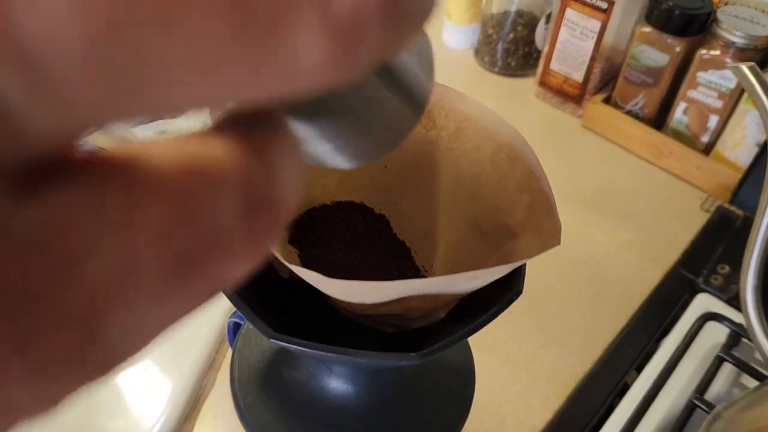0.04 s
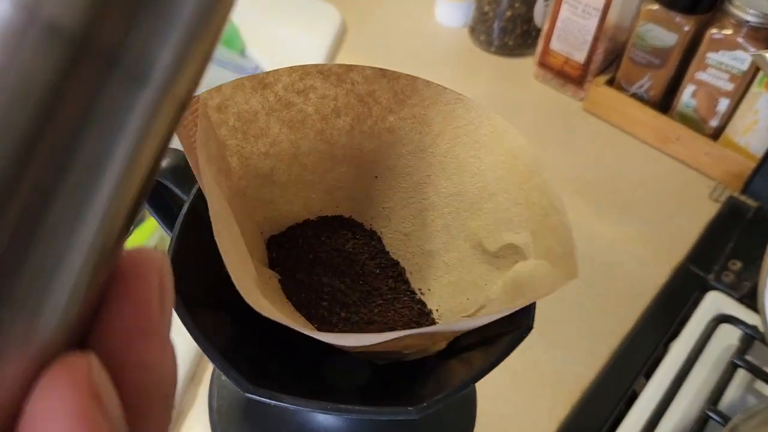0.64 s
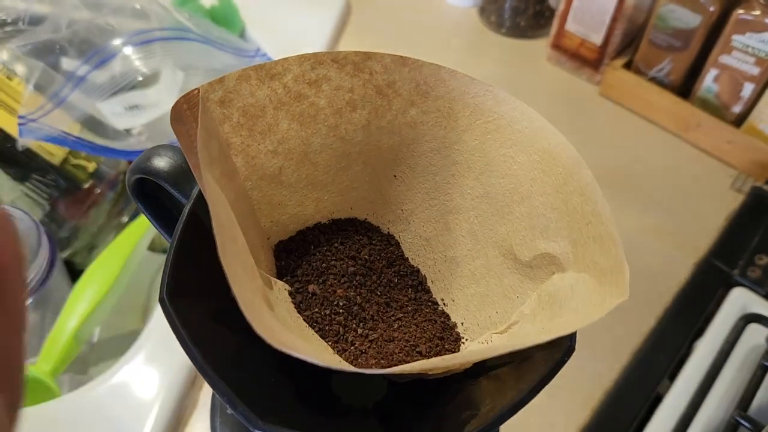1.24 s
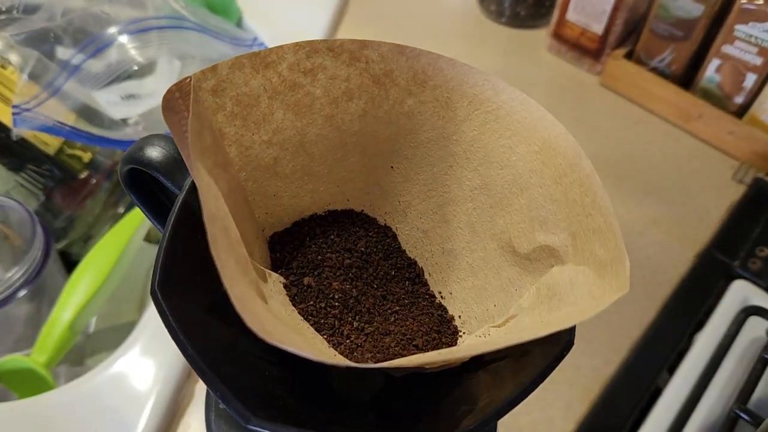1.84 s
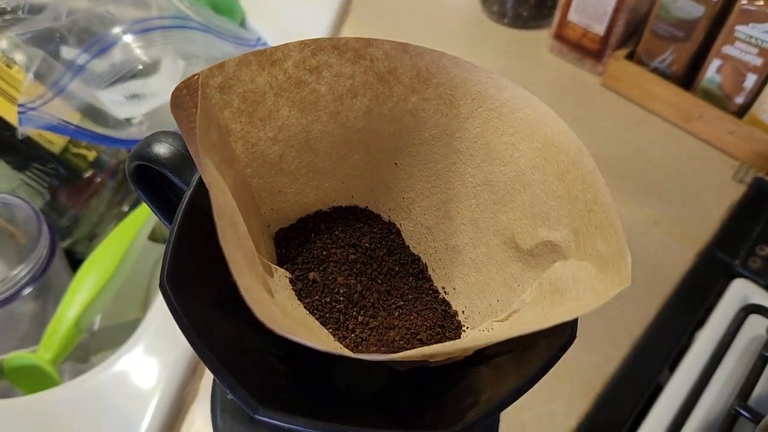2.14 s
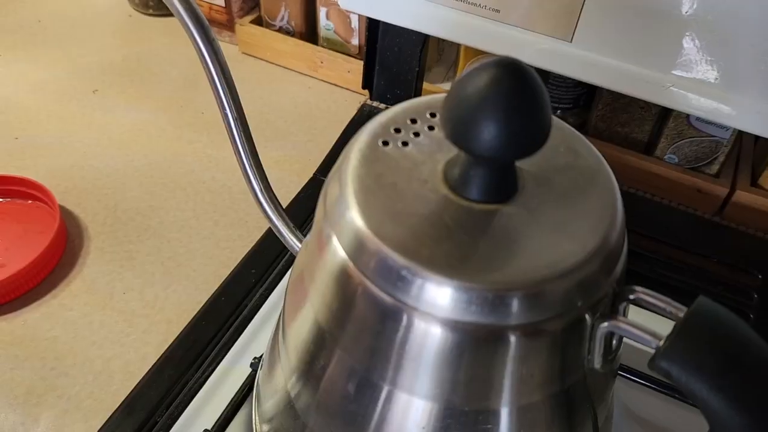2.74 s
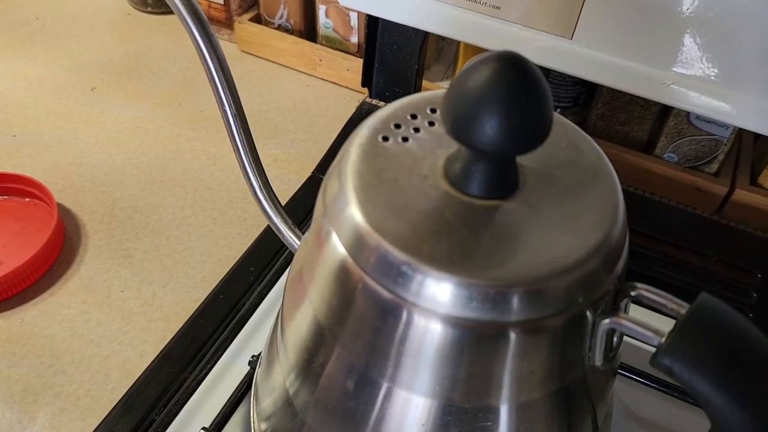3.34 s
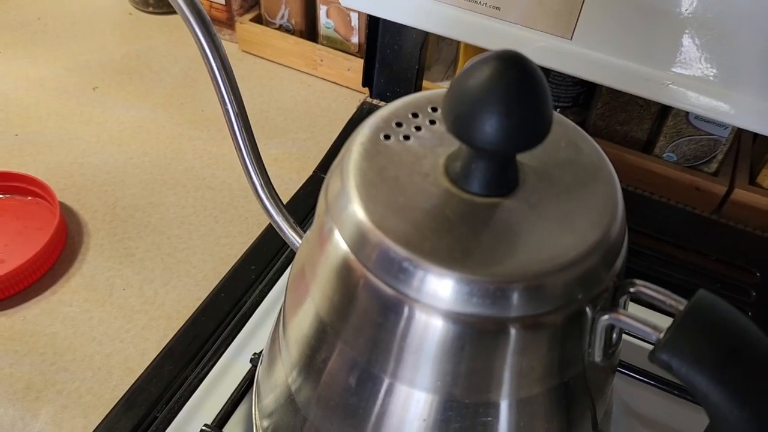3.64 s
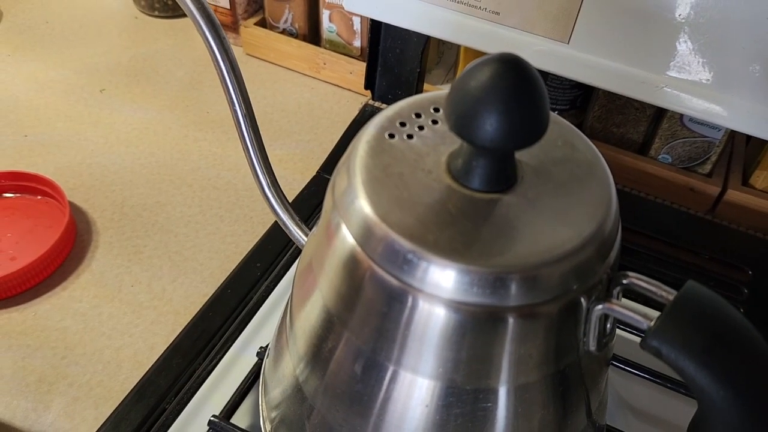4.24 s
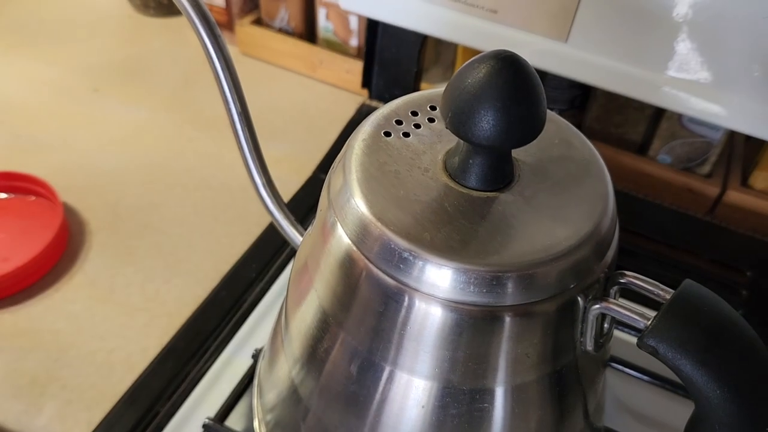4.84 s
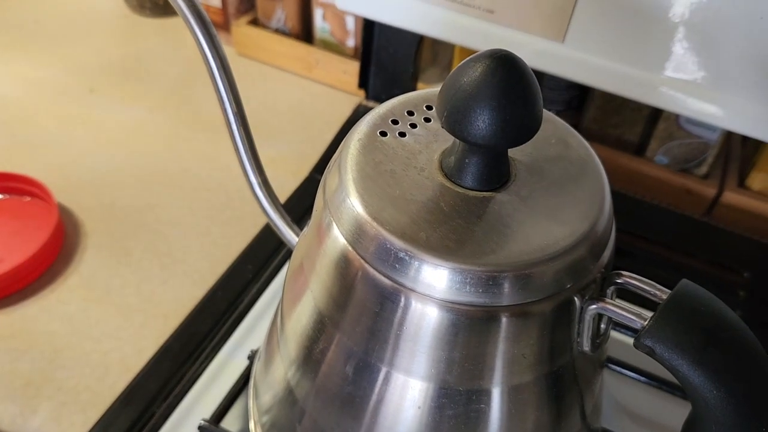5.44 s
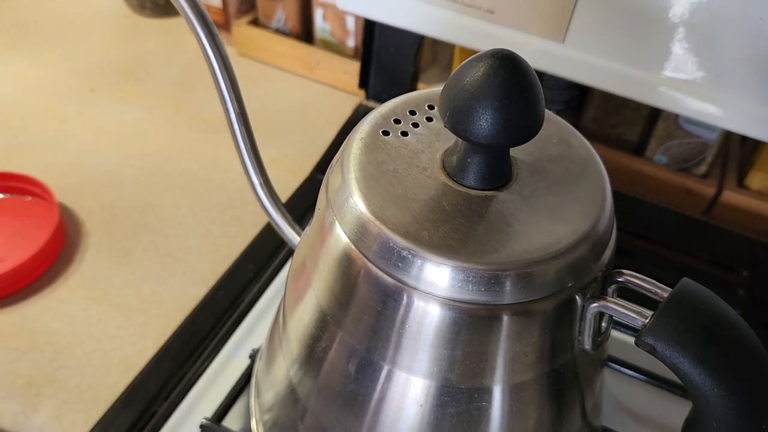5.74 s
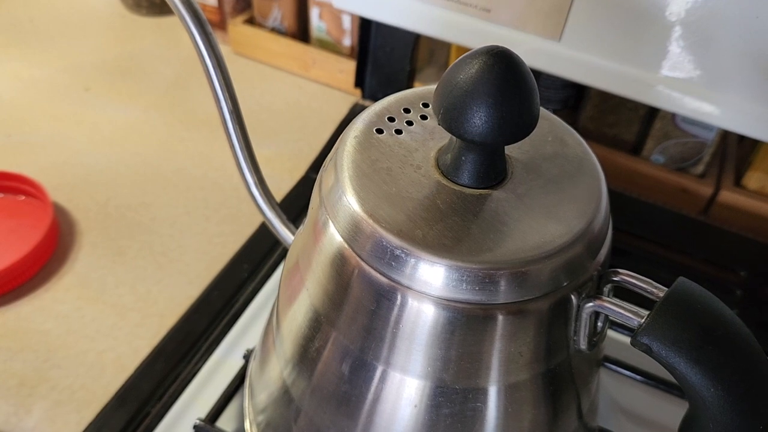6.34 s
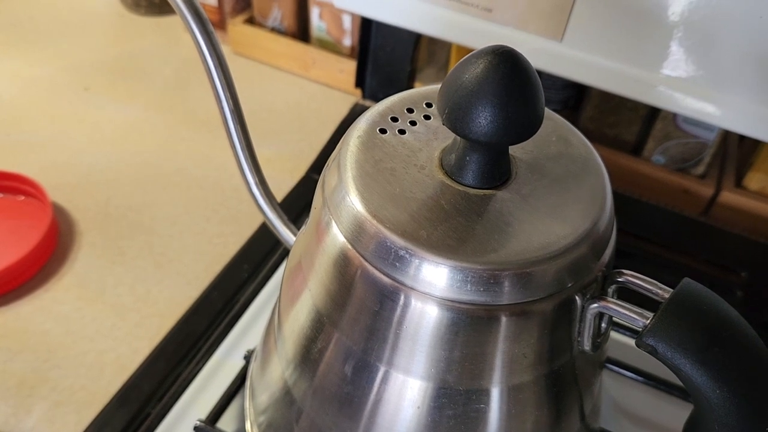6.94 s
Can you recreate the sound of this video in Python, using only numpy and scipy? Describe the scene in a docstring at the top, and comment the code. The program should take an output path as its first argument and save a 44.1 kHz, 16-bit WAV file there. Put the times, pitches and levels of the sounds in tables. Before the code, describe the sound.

In a small kitchen with a faint appliance hum, fingers softly brush a steel coffee scoop. The scoop clinks against a plastic cone, scrapes with a brief, hollow falling note, slides and clinks again. After a moment of near silence, a steel kettle is heard heating close by: a steady, soft hiss with irregular flurries of tiny bubbles that make its wall ring, over the low rumble of a gas flame.

```python
"""Over a faint kitchen hum, fingers brush a steel coffee scoop. It clinks on a plastic cone, scrapes,
knocks, slides and clinks again; the air in its cup rings with a note that falls as its mouth is covered.
After a short, almost silent gap, a steel kettle heats on a gas burner. Tiny steam bubbles collapse in a
steady hiss, and flurries of larger ones make its wall sing near 1.5 kHz while the flame rumbles."""
import sys
import numpy as np
from scipy import signal
from scipy.fft import rfft, irfft, next_fast_len
from scipy.io import wavfile
from scipy.ndimage import map_coordinates

SR = 44100
rng = np.random.default_rng(int(sys.argv[2]) if len(sys.argv) > 2 else 0)


def dump(signal):
    """Clip the signal to [-1, 1] and save it as 16-bit WAV at the path in sys.argv[1]."""
    limited = np.clip(np.atleast_2d(signal).T, -1, 1)
    pcm = np.round(limited * 32767).astype(np.int16)
    wavfile.write(sys.argv[1], SR, pcm)


N = 317520
GAP_START_S, GAP_END_S = 2.492, 2.578  # the pause between scoop and kettle

# the notes of the scoop's wall and rim: f/Hz, level/dB, ring time/s (the time to fade by 60 dB)
WALL_NOTES = [(1763, -21, .04), (1970, -7, 0.035), (1995, -7, 0.088), (2010, -28, .12), (2170, -17, .03),
              (2690, -30, 0.063), (5530, -29.5, 0.074), (7100, -35, .035), (7440, -49, .09),
              (8651, -42.5, .12)]
RIM_NOTES = [(3373, 0, .155)]
CUP_PITCH = [(.94, 828), (.99, 819), (1.04, 725), (1.066, 645), (1.13, 570), (1.6, 558)]  # the falling note of the air in the scoop: t/s, f/Hz
EAR_LIKENESS = [(60, 0.96), (180, 0.84), (550, 0.17), (1650, -0.39), (4970, -0.39), (15000, -0.41)]  # how alike the room sounds in both ears: f/Hz, likeness (1 = same)
RUMBLE_TONE = [(15, -38), (25, -6.5), (55, 2), (81, -4.5), (108, -5.5), (153, -5), (210, -39.5), (233, -33),
               (270, -17.5), (301, -19), (372, -22), (505, -14.5), (561, -15), (600, -24.5), (780, -48),
               (1320, -120)]  # the tone of the flame and of a faint background rumble: f/Hz, level/dB


def clinks():
    """Each hit clicks, rings the scoop and cone, puffs the air in the cup and knocks on the counter."""
    # the hits: t/s, level/dB of wall, edge, rim, cup air, cone, knock and click, damping factor
    hits = [(.94, -8, -46, -40.5, -7.5, -26.5, -49.5, -23, .76),
            (.9452, -28.5, -50.5, -50.5, -39, -32, -60, -33.5, 1),
            (.987, -52, -55.5, -45.5, -62, -61, -64, -47, 1),
            (1.0625, -31, -45, -47, -16.5, -42, -27.5, -26.5, 1.4),
            (1.076, -60, -42, -64, -52, -55, -46, -44, 1),
            (1.0875, -35, -50, -48.5, -50, -36, -42, -36, 1.2),
            (1.279, -65, -74, -75, -70, -57, -48, -54, 1.3),
            (1.453, -28, -51.5, -46, -65, -61.5, -62, -48.5, 1),
            (1.5679, -4, -26, -36, -51, -26.5, -24.5, -25, 2.1),
            (1.5805, -25.5, -49.5, -53, -64, -65.5, -60.5, -51, .9)]
    # what rings: f/Hz, level/dB, ring time/s
    edge_notes = [(3630, 3, .018), (3989, 4.5, .018), (4194, 0, .018), (4646, -4, .016), (5039, -4, .025)]  # the clack of the scoop's edge
    cone_notes = [(654, -10.5, .045), (790, -1, .06), (1000, -6.5, .03), (1120, -3.5, .03),
                  (1400, -9, .025), (1570, -7, .025)]  # the plastic cone
    counter_notes = [(92, -7.5, .025), (162, -9, 0.014), (280, -8.5, .028), (400, -0.5, 0.012),
                     (540, -2, 0.016)]  # the dull counter top
    click_tone = [(100, -22.5), (700, 12.5), (2200, -5.5), (3000, -8.5), (4200, -5), (5800, 3.5),
                  (9000, -3.5), (12000, -12.5), (15000, -8.5)]  # the click of a hit: f/Hz, level/dB
    wall, rim, hollow, knock, click = np.zeros((5, N))
    t = np.arange(SR // 2) / SR
    for s, wall_db, edge_db, rim_db, cup_db, cone_db, knock_db, click_db, damping in hits:
        add(wall, s, amp(wall_db) * ring(WALL_NOTES, t, attack_s=0.00045, damping=damping))
        add(rim, s, amp(edge_db) * ring(edge_notes, t, attack_s=0.00057))
        add(rim, s, amp(rim_db) * ring(RIM_NOTES, t, attack_s=0.0029))
        pitch = np.interp(s + t, *np.transpose(CUP_PITCH))
        ring_s = .082 * (pitch[0] / CUP_PITCH[0][1]) ** 4.5  # a narrower mouth ends the note sooner
        puff = amp(-60 * t / ring_s) * (1 - np.exp(-t / 0.004))
        add(hollow, s, amp(cup_db) * puff * np.sin(2 * np.pi * np.cumsum(pitch) / SR))
        add(hollow, s, amp(cone_db) * ring(cone_notes, t, attack_s=0.00065, damping=damping))
        add(knock, s, amp(knock_db) * ring(counter_notes, t, attack_s=0.00027))
        add(click, s, amp(click_db) * (amp(-60 * t / 0.015) + amp(-33.5 - 60 * t / 0.12)))
    return (place(wall, left_db=3, lag_ms=0.41)
            + place(rim, left_db=10, lag_ms=0.35)
            + place(hollow, left_db=1, lag_ms=0.06)
            + place(knock, left_db=5.5, lag_ms=0.12)
            + place(click * coloured(noise(), click_tone), left_db=4, lag_ms=0.49))


def scrape():
    """The scoop's edge scrapes, sounding the air in its cup and shaking the counter."""
    stroke = [(.943, -52), (.969, -49.5), (.991, -49.5), (1.008, -59), (1.024, -54.5), (1.046, -44),
              (1.057, -56.5), (1.068, -41), (1.078, -43), (1.088, -39.5), (1.115, -83), (1.14, -59.5),
              (1.18, -71), (1.225, -65), (1.262, -85)]  # how hard the edge presses: t/s, level/dB
    grit_tone = [(400, -15.5), (650, 5.5), (1400, -17.5), (2000, -5.5), (2700, -15), (3400, -10),
                 (4500, -16), (5150, -6.5), (5600, -1.5), (6250, -17), (7000, -5.5), (8300, -18.5),
                 (9700, -7), (10500, -20.5), (11100, -16.5), (12000, -24), (14500, -19.5), (16000, -27)]  # the gritty scraping: f/Hz, level/dB
    counter_bands = [(110, 54, 6.5), (190, 50, -2.5), (245, 44, 4.5), (325, 60, 1), (470, 97, -3.5)]  # where the counter shakes: f/Hz, width/Hz, level/dB
    grit = rub(stroke, grit_tone, rasp_db=4, wall_db=-29, rim_db=-50.5)
    pressure = amp(curve(stroke)) * during(stroke)
    pitch = curve(CUP_PITCH)
    phase = 2 * np.pi * np.cumsum(pitch) / SR
    openness = (pitch / CUP_PITCH[0][1]) ** 3  # the note fades as the mouth closes
    cup = openness * (wobble(90) * np.cos(phase) + wobble(90) * np.sin(phase))
    judder = resonate(noise()[0], counter_bands)
    return grit + place(pressure * (amp(0.5) * cup + amp(-5.5) * judder), left_db=7.5, lag_ms=.1)


def slide():
    """The scoop slides on its side with a rasp."""
    stroke = [(1.255, -80), (1.278, -61.5), (1.298, -61), (1.312, -70), (1.372, -64.5), (1.424, -39.5),
              (1.452, -40), (1.468, -49.5), (1.495, -43.5), (1.562, -49), (1.598, -71), (1.625, -63),
              (1.676, -65.5), (1.705, -106)]  # how hard the side presses: t/s, level/dB
    rasp_tone = [(120, -36), (200, -15.5), (328, -21), (558, -11), (933, -15.5), (1530, -18), (2020, -8.5),
                 (2510, -14.5), (3000, -17), (3350, -12.5), (4000, -9), (4900, -15), (5500, -8),
                 (6100, -8.5), (7100, -16.5), (8300, -15), (11500, -21.5), (13800, -21.5), (14700, -14),
                 (16000, -25)]  # the sliding rasp: f/Hz, level/dB
    return rub(stroke, rasp_tone, rasp_db=1, wall_db=-30.5, rim_db=-46)


def rub(stroke, tone, rasp_db, wall_db, rim_db):
    """Tiny slips rasp as the scoop moves, and keep its steel singing."""
    pressure = amp(curve(stroke) + 1.6 * wobble(70) + 1.2 * wobble(380)) * during(stroke)
    slips = (coloured(grains(per_second=5000), tone) for _ in range(2))
    here, there = (unit(rippled(slip, depth_db=2.2, spacing_hz=250)) for slip in slips)
    travel = 2 * np.pi * 7 * clock() + wobble(18)  # the tone shifts as the touching point moves
    rasp = pressure * (np.cos(travel) * here + np.sin(travel) * there)
    # rubbing blurs each note by 6 Hz; notes that ring longer build up louder
    bands = ([(hz, 2.2 / ring_s + 6, db + 20 * np.log10(ring_s)) for hz, db, ring_s in notes]
             for notes in (WALL_NOTES, RIM_NOTES))
    wall, rim = (resonate(noise(), part) for part in bands)
    sing = pressure ** 0.47 * (amp(wall_db) * wall + amp(rim_db) * rim)  # even a light touch sings
    return place(amp(rasp_db) * rasp + sing, left_db=5.5, lag_ms=0.31)


def catches():
    """Where the moving scoop catches, its main note swells and fades without a click."""
    moments = [(.992, -38), (1.238, -53), (1.462, -37), (1.488, -43.5), (1.506, -42.5), (1.53, -42.5),
               (1.552, -43.5), (1.628, -51.5), (1.66, -52)]  # each catch: t/s, level/dB
    note = unit(np.sin(2 * np.pi * 2000 * clock() + wobble(60.02)))
    return place(swells(moments, width_s=0.0067) * note, left_db=2.5, lag_ms=0.38)


def kettle():
    """Steam bubbles collapse on the hot base: small ones hiss, flurries of large ones ring the wall."""
    # what the bubbles ring: f/Hz, width/Hz, level/dB
    wall_bands = [(587, 17, -18), (673, 2.3, 6), (706.5, 5.1, 7), (837, 11, -4.5), (870, 8.3, -5),
                  (917, 7.3, -5), (993, 7.7, -2), (1061, 11, -9.5), (1157, 21, -4), (1253, 14, -4.5),
                  (1330, 6.1, -5), (1437.5, 14.4, 4.5), (1461.5, 46, -1.5), (1508, 33, 5), (1520, 11, -7.5),
                  (1692, 18, -8.5), (1822, 18, -17.5), (2028, 33, -3.5), (2215, 48, -2.5), (2310, 26, -1.5),
                  (2412, 15, -14.5), (2547, 13, -16.5), (2935, 30, -3.5), (3433, 42, -4.5)]  # the kettle's wall
    gurgle_bands = [(575, 28, -3), (687, 41, 5), (789, 47, -2.5), (869, 29, -0.5), (991, 28, -4.5),
                    (1142, 77, -11.5)]  # the lower notes that follow a flurry
    patter_tone = [(300, -25), (750, 3), (1100, -13), (1500, 5), (2300, 12), (3100, 10), (4300, -5),
                   (7000, 3), (15000, -22)]  # the patter of a flurry: f/Hz, level/dB
    crackle_tone = [(300, 13.5), (800, -14), (3000, -18), (4500, 8), (7000, 3), (16000, -28)]
    leaders, swarm, trail = flurries()
    simmer = amp(-55 + 1.46 * wobble(55)) * grains(per_second=1100)
    pops = simmer + amp(-6.5) * swarm * grains(per_second=2700)
    wall_taps = leaders + blend(pops, likeness=[(600, 0.81), (1500, 0.68), (2200, 0.62)])
    wall = amp(-53.5) * resonate(wall_taps, wall_bands)
    crackle = amp(-67.5) * coloured(pops, crackle_tone)
    patter = amp(-12) * swarm * coloured(grains(per_second=2200), patter_tone)
    hiss = steam_hiss()
    gurgle = amp(3) * trail * resonate(grains(per_second=630)[0], gurgle_bands)
    sizzle = rippled(hiss + crackle + patter, depth_db=3.5, spacing_hz=45)
    return place(wall + gurgle, left_db=-4, lag_ms=0.098) + place(sizzle, left_db=-1.5, lag_ms=0)


def flurries():
    """A big bubble sets off a swarm, and larger ones trail it: the strength of all three over time."""
    strong = [(2.64, -42, 0.032), (2.838, -41.5, 0.01), (2.848, -36.5, 0.012), (2.893, -57, .0063),
              (2.922, -43, .0086), (3.02, -37, 0.013), (3.07, -39, .011), (3.155, -43.5, 0.021),
              (3.218, -42.5, 0.012), (3.299, -36.5, 0.007), (3.399, -43.5, 0.053), (3.582, -39, 0.022),
              (3.68, -41, 0.0057), (3.797, -38.5, .01), (3.847, -39.5, 0.012), (3.984, -39.5, .015),
              (4.072, -46, 0.018), (4.152, -38, 0.017), (4.382, -40.5, 0.014), (4.45, -48, 0.023),
              (4.505, -44.5, 0.024), (4.55, -39, 0.02), (4.6, -46, 0.011), (4.76, -39, .01),
              (4.854, -38, 0.0085), (4.965, -41.5, 0.018), (5.005, -48, .01), (5.11, -42, 0.01),
              (5.216, -38.5, 0.017), (5.434, -38, .012), (5.569, -40, 0.014), (5.62, -37, 0.017),
              (5.806, -38.5, 0.014), (5.837, -42.5, 0.014), (6.038, -42, 0.01), (6.08, -49, .01),
              (6.155, -43, 0.015), (6.33, -43, 0.016), (6.577, -39, 0.014), (6.677, -36, 0.014),
              (6.77, -40, 0.017), (6.83, -39.5, 0.014), (6.933, -42, 0.0099), (7.04, -44, .028)]  # strong bursts of collapsing bubbles: t/s, level/dB, decay/s
    t = np.arange(SR // 4) / SR
    leaders, swarm, trail = np.zeros((3, N))
    for s, db, decay_s in list(strong) + small_flurries(strong, tries=60):
        leaders[round(s * SR)] = amp(db + 11.5)
        add(swarm, s - 0.00086, amp(db + 2.5) * (1 - np.exp(-t / 0.0028)) * np.exp(-t / decay_s))
        add(trail, s, amp(db - 14) * (1 - np.exp(-t / 0.031)) * np.exp(-t / 0.034))
    return leaders, swarm, trail


def small_flurries(strong, tries):
    """Weak flurries come by chance, except near a strong one, where steam needs time to gather."""
    typical_per_s, gather_s, decay_s = 17, 0.098, 0.018
    waits, sizes = rng.standard_normal((tries, 2)).T
    times = GAP_END_S + np.cumsum(np.exp(0.67 * waits) / typical_per_s)
    strong_times = np.transpose(strong)[0]
    return [(s, -54.5 + 4 * size, decay_s) for s, size in zip(times, sizes)
            if s < (N - 1) / SR and np.abs(strong_times - s).min() > gather_s]


def steam_hiss():
    """Tiny collapsing bubbles hiss, spit now and then, and ease off as the water warms."""
    spits = [(3.6, -8), (4.32, -5), (4.755, -5), (5.25, -3), (6.685, -3), (6.82, -5), (7.04, 1.5),
             (7.16, -6)]  # spits of fine bubbles: t/s, level/dB relative to the steady hiss
    hiss_tone = [(240, -60), (400, -10), (687, -18.5), (777, -8), (1270, -13), (1490, -9), (1870, -12),
                 (2290, -11), (3530, -11.5), (4150, -14.5), (4650, -23), (5000, -16.5), (5420, -16),
                 (5960, -14.5), (7050, -18), (8000, -16.5), (10200, -14.5), (10900, -20), (11500, -17.5),
                 (13500, -17), (14400, -18), (15000, -24), (16000, -30)]  # the steady hiss: f/Hz, level/dB
    high_bands = [(4320, 110, -4), (4915, 78, 1), (5156, 104, -1), (5770, 81, 1.5), (6110, 150, 1),
                  (6600, 135, 1.5), (7330, 230, -2.5), (8660, 200, -5), (9070, 210, -6), (9430, 160, -11),
                  (11650, 180, -1), (12360, 290, -6.5), (13350, 400, -10)]  # the kettle's high notes: f/Hz, width/Hz, level/dB
    steady = amp(-56 - 0.13 * (clock() - GAP_END_S) + 1.1 * wobble(35))
    strength = steady * (1 + swells(spits, width_s=0.0069))
    fizz = amp(1) * coloured(grains(per_second=9000), hiss_tone)
    shimmer = amp(-3) * resonate(grains(per_second=2500), high_bands)
    return strength * (fizz + shimmer)


def burner():
    """The gas flame rumbles and flutters, the hollow under the kettle booms and the stove top drones."""
    flame_levels = [(2.6, -57.5), (2.78, -66.5), (2.89, -56), (4.1, -55), (4.8, -56.5), (5.24, -56.5),
                    (5.5, -57), (6.25, -57), (7.07, -57), (7.2, -58)]  # the strength of the flame: t/s, level/dB
    throb_levels = [(2.8, -74), (2.88, -59), (3.13, -54.5), (3.45, -56), (3.78, -57.5), (3.98, -63),
                    (4.9, -69), (5.14, -59.5), (5.25, -51.5), (5.33, -64), (5.72, -62), (5.82, -54),
                    (5.96, -53), (6.05, -66), (6.19, -50.5), (6.32, -59), (6.42, -67), (7.2, -64)]  # the flame swells the hollow's lowest note: t/s, level/dB
    # what the flame rings: f/Hz, width/Hz, level/dB
    hollow_bands = [(116.5, 10, 2), (149.4, 5.8, 1)]
    stove_bands = [(248, 8.1, -10.5), (298, 4.6, -1), (326.7, 8.6, -4), (571.4, 12.6, -0.5)]
    roar = coloured(blend(noise(), likeness=[(100, 0.96), (300, 1), (700, 1)]), RUMBLE_TONE)
    boom = resonate(noise()[0], hollow_bands)
    drone = amp(-66) * resonate(noise()[0], stove_bands)
    throb_strength = amp(curve(throb_levels) + 3.2 * wobble(11))
    throb = throb_strength * unit(np.sin(2 * np.pi * 75.7 * clock() + 1.2 * wobble(15)))
    flame = amp(curve(flame_levels) + 1.56 * wobble(9)) * (amp(-1) * roar + amp(-12.5) * boom)
    return place(flame + throb, left_db=-0.5, lag_ms=-0.066) + place(drone, left_db=12, lag_ms=0)


def fingers():
    """Soft rustles and a low bump as the hand shifts its grip, then a faint swish of skin on steel."""
    touches = [(.275, -62), (.42, -67)]  # fingers brush the handle: t/s, level/dB
    rustle_tone = [(300, -22), (600, 6), (850, -15), (1030, 8), (1400, -13), (2500, -15), (5000, -35)]  # their rustle: f/Hz, level/dB
    rustle = swells(touches, width_s=0.016) * coloured(blend(noise(), EAR_LIKENESS), rustle_tone)
    bump = swells([(.297, -61)], width_s=0.022) * resonate(noise()[0], [(75, 16, 0)])
    swish = swells([(.545, -74)], width_s=.02) * resonate(noise(), [(6700, 300, -9), (8400, 200, 4)])
    return rustle + bump + swish


def kitchen_echo(x, echo_db, ring_s):
    """Nearby walls and cupboards throw the sound back as a short tail."""
    t = np.arange(SR // 3) / SR
    tail = rng.standard_normal((2, len(t))) * amp(-60 * t / ring_s) * (t > .004)
    return x + amp(echo_db) * signal.fftconvolve(x, tail / np.linalg.norm(tail[0]), axes=1)[:, :N]


def room_tone():
    """Still air, a faint whine and the wavering hum of an appliance."""
    # the quiet room's low murmur and high hiss: f/Hz, level/dB
    air_tone = [(15, -44.5), (25, -13.5), (50, -6), (155, -9.5), (188, -20.5), (270, -12.5), (294, -18.5),
                (372, -24), (472, -17), (936, -28.5), (1020, -26.5), (1140, -32.5), (1740, -23),
                (2110, -29.5), (3460, -37), (4200, -47.5), (5460, -87), (9240, -120)]
    hiss_tone = [(2500, -33.5), (4300, -6.5), (6200, -2.5), (7300, -4), (8600, 3.5), (10500, -9.5),
                 (12500, -8.5), (14800, -7), (16000, -25.5)]
    whine_band = [(8600, 130, 0)]  # a thin, high whine: f/Hz, width/Hz, level/dB
    hum_notes = [(81, -64.5, -63, 13), (126, -72.5, -82, 1), (161, -93, -58, 3), (304, -70.5, -67, 2.2),
                 (650, -75.5, -76.5, 7.9), (1050, -88.5, -90, 90), (1330, -88, -80.5, 15),
                 (1745, -81.5, -71, 69), (3410, -91.5, -83.5, 72)]  # the appliance: f/Hz, level/dB at the start, level/dB at the gap, width/Hz
    t = clock()
    air = amp(-60.5 + wobble(9.8)) * coloured(blend(noise(), EAR_LIKENESS), air_tone)
    hiss = amp(-81.5) * coloured(noise(), hiss_tone)
    whine = amp(-88.5) * resonate(noise(), whine_band)
    hum = 0
    for hz, first_db, last_db, width in hum_notes:
        phase = 2 * np.pi * hz * t + 0.96 * wobble(width)
        flutter_db = min(width / 7, 4.5) * wobble(width)  # wide notes flutter most
        hum += amp(np.interp(t, [0, GAP_START_S], [first_db, last_db]) + flutter_db) * np.sin(phase)
    return air + hiss + whine + place(hum, left_db=0.5, lag_ms=0)


def ring(notes, t, attack_s, damping=1):
    """Struck notes, a little different in strength each time; more damping ends them sooner."""
    fading = sum(amp(db + rng.normal(0, 0.21) - 60 * damping * t / ring_s) * np.sin(2 * np.pi * hz * t)
                 for hz, db, ring_s in notes)
    return (1 - np.exp(-t / attack_s)) * fading


def resonate(x, bands):
    """Let x ring a body with these bands (f/Hz, width/Hz, level/dB), then scale it to strength 1."""
    return unit(filtered(x, lambda f: sum(
        amp(db) * 1j * f * width / (hz * hz - f * f + 1j * f * width) for hz, width, db in bands)))


def rippled(x, depth_db, spacing_hz):
    """The crowded notes of thin steel colour the sound differently in each ear."""
    ears = rng.standard_normal((2, 500))
    return filtered(x, lambda hz: amp(
        depth_db * np.array([map_coordinates(ear, [hz / spacing_hz], mode="wrap") for ear in ears])))


def coloured(x, tone):
    """Shape x with a tone curve (f/Hz, level/dB), then scale it to strength 1."""
    return unit(filtered(x, lambda hz: amp(along(tone, hz))))


def blend(pair, likeness):
    """Mix two unrelated signals so the ears sound as alike as the rows (f/Hz, likeness) ask."""
    angle = lambda hz: np.arccos(np.clip(along(likeness, hz), -1, 1)) / 2
    mid, side = filtered(pair, lambda hz: np.array([np.cos(angle(hz)), np.sin(angle(hz))]))
    return np.array([mid + side, mid - side])


def place(x, left_db, lag_ms):
    """A source on the left is louder there and reaches the right ear later."""
    left = lambda hz: np.full_like(hz, amp(left_db / 2))
    right = lambda hz: amp(-left_db / 2) * np.exp(-2j * np.pi * hz * lag_ms / 1000)
    return filtered(x, lambda hz: np.array([left(hz), right(hz)]))


def filtered(x, response):
    """Scale and delay each frequency of x by response(hz)."""
    size = next_fast_len(N + SR // 2)
    return irfft(rfft(x, size) * response(np.fft.rfftfreq(size, 1 / SR)), size)[..., :N]


def grains(per_second):
    """Random ticks of random size in each ear, at strength 1."""
    return unit(noise() * (rng.random((2, N)) < per_second / SR))


def noise():
    """Unrelated white noise for each ear."""
    return rng.standard_normal((2, N))


def wobble(rate):
    """A smooth curve through rate random values a second."""
    return map_coordinates(rng.standard_normal(int(N * rate / SR) + 4), [clock() * rate])


def swells(rows, width_s):
    """A bell-shaped swell for each row (t/s, level/dB)."""
    t = clock()
    return sum(amp(db) * np.exp(-.5 * ((t - s) / width_s) ** 2) for s, db in rows)


def curve(rows):
    """Join rows (t/s, value) into one value per sample."""
    return np.interp(clock(), *np.transpose(rows))


def during(rows):
    """True between the times of the first and last row."""
    return (clock() > rows[0][0]) & (clock() < rows[-1][0])


def along(rows, hz):
    """Join rows (f/Hz, value) on a log scale and read them at hz."""
    frequencies, values = np.transpose(rows)
    return np.interp(np.log(hz + 1), np.log(frequencies + 1), values)


def add(track, s, sound):
    """Mix a sound into a track, s seconds in."""
    part = track[..., round(s * SR):][..., :sound.shape[-1]]
    part += sound[..., :part.shape[-1]]


def clock():
    """The time of every sample in seconds."""
    return np.arange(N) / SR


def amp(db):
    """Turn decibels into a multiplier."""
    return 10 ** (np.asarray(db) / 20)


def unit(x):
    """Scale x to an average strength (rms) of 1."""
    return x / np.sqrt(np.mean(x ** 2) + 1e-20)


def scene():
    """First the scoop, then a moment of near silence, then the stove."""
    t = clock()
    fade_out = np.clip((GAP_START_S - t) / 0.015 + 1, 0, 1)
    fade_in = np.clip((t - GAP_END_S) / 0.028 + .5, 0, 1)
    scoop = scrape() + slide() + clinks() + catches()
    at_counter = kitchen_echo(scoop, echo_db=-12, ring_s=0.1) + fingers() + room_tone()
    at_stove = kettle() + burner()
    faint_rumble = amp(-90.5) * coloured(noise(), RUMBLE_TONE)
    return fade_out * at_counter + fade_in * at_stove + faint_rumble


def record(dry):
    """Smoothly cut off the very highest treble."""
    top_hz, fade_hz = 15850, 500
    return filtered(dry, lambda hz: np.sin(np.pi / 2 * np.clip((top_hz - hz) / fade_hz + .5, 0, 1)) ** 2)


dry = scene()
out = record(dry)
dump(out)
```